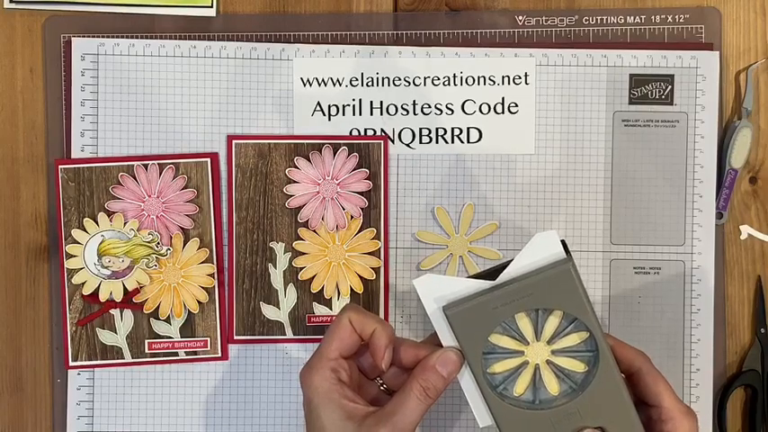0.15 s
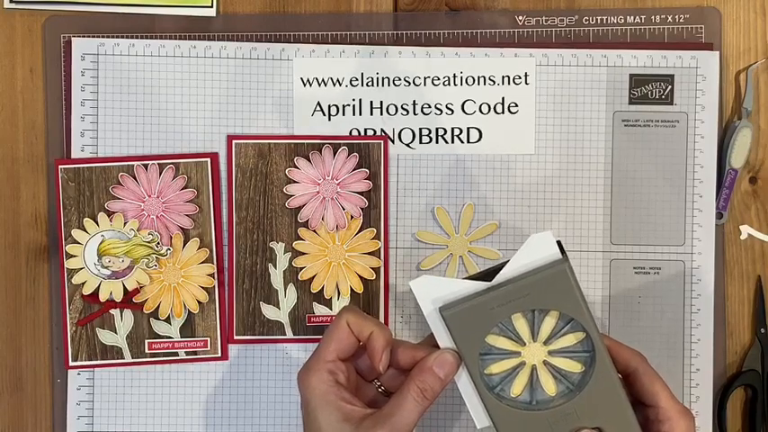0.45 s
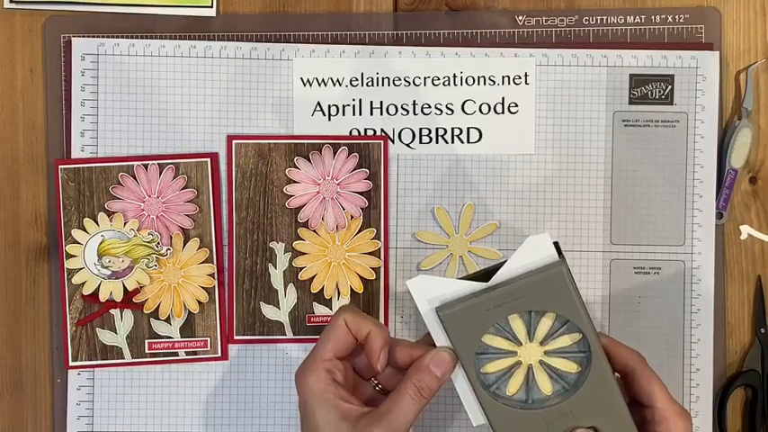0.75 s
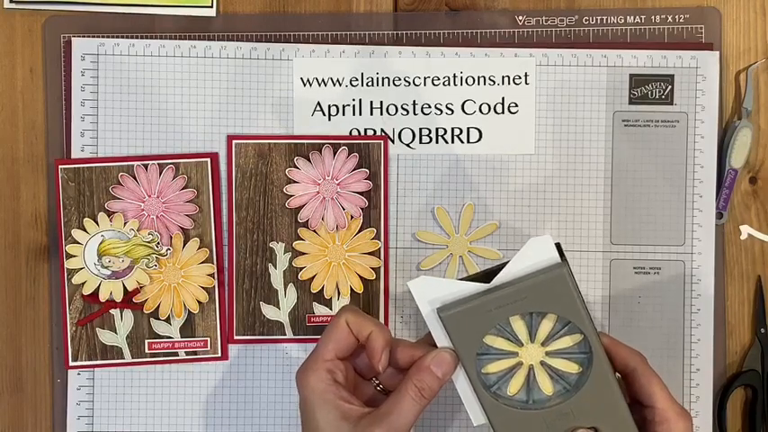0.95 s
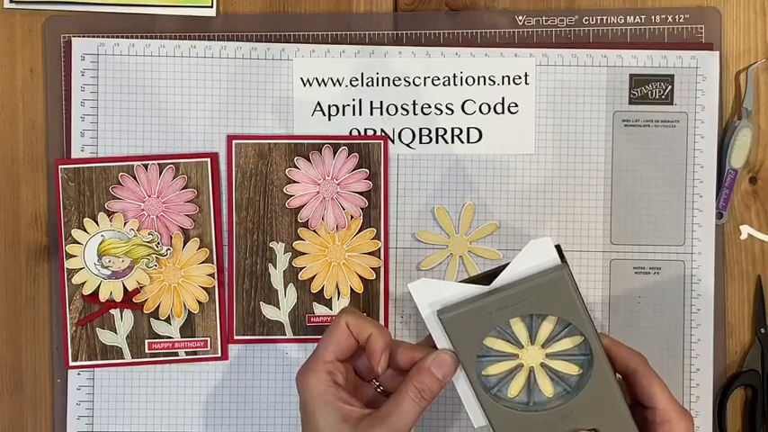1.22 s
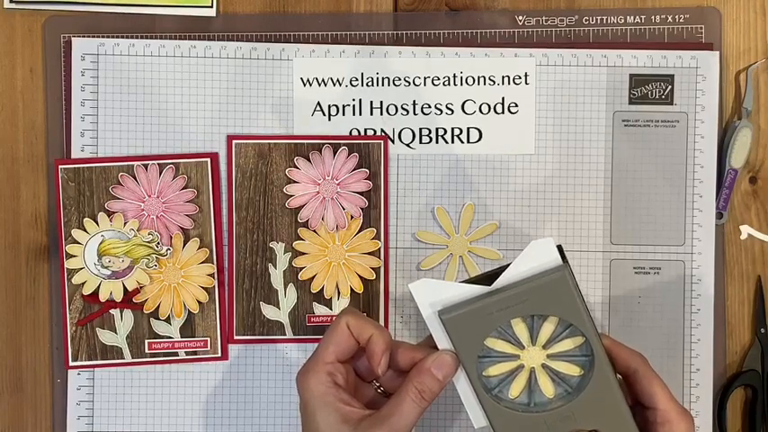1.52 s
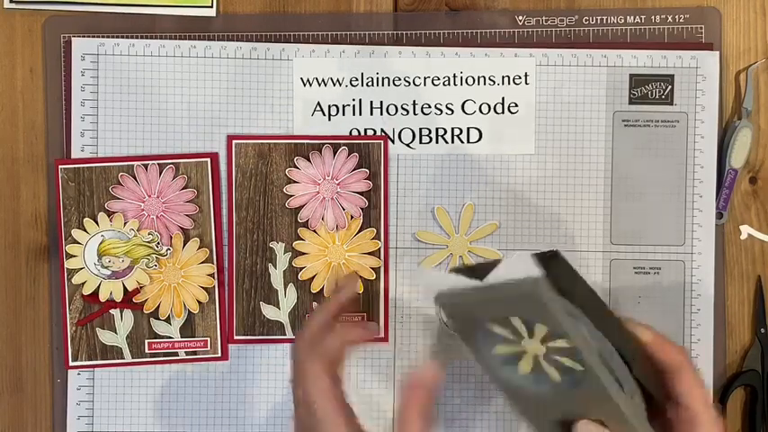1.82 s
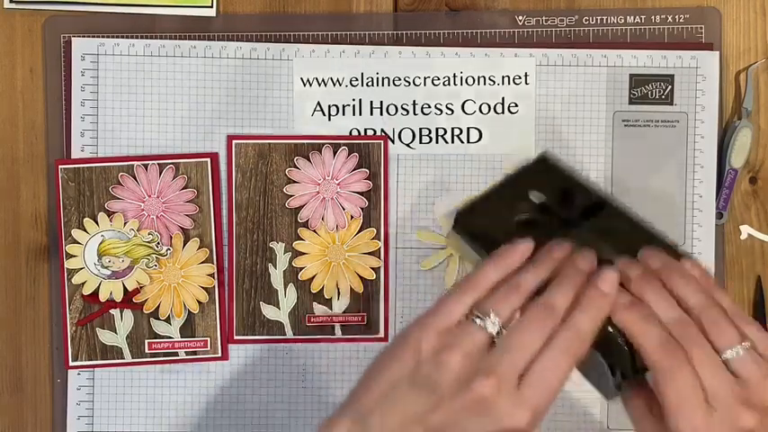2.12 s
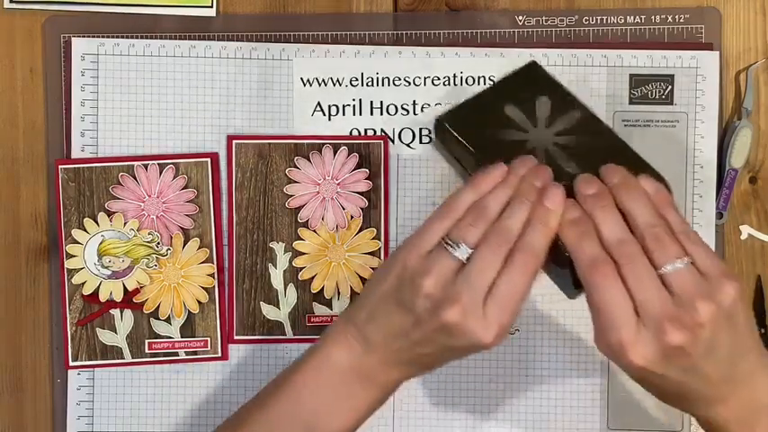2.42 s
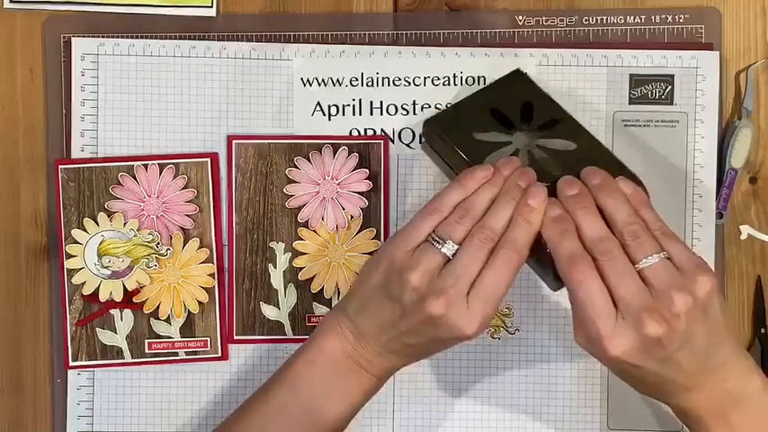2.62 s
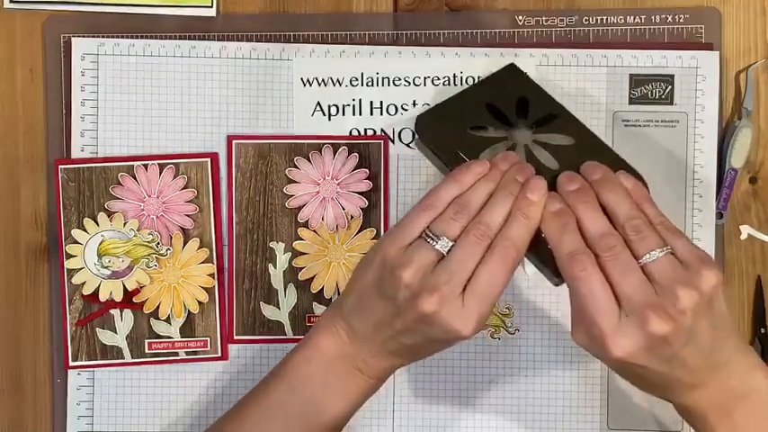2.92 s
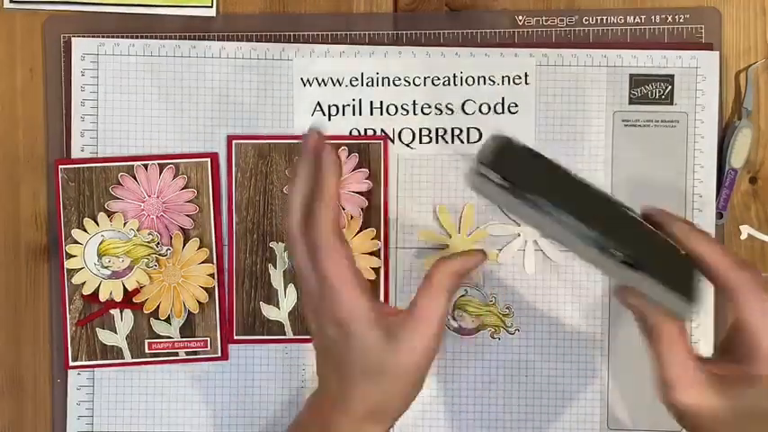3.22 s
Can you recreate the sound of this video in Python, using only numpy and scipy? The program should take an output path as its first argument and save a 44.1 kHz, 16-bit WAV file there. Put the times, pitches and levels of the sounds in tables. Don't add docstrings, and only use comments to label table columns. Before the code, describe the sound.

Paper punch squeezed on card: small sharp cracks, then one hard metallic snap in a quiet room.

```python
import sys
import numpy as np
from scipy import signal
from scipy.fft import rfft, irfft, next_fast_len
from scipy.io import wavfile
from scipy.ndimage import uniform_filter1d, map_coordinates

SR = 44100
rng = np.random.default_rng(int(sys.argv[2]) if len(sys.argv) > 2 else 0)


def to_linear_factor(level_db):
    exponent = np.asarray(level_db, float) / 20
    return 10 ** exponent


def transcribe(signal):
    frames = np.atleast_2d(signal).T
    limited = np.clip(frames, -1, 1)
    pcm = np.round(limited * 32767).astype(np.int16)
    wavfile.write(sys.argv[1], SR, pcm)


N = 147735
TIME = np.arange(N) / SR

# frequency in Hz, density in dB per Hz.
AIR_COLOUR = [(16, -54), (30, -16.5), (55, -6.5), (88, -1), (156, -7), (383, -10), (652, -14),
              (1500, -21.5), (1950, -52), (3300, -120)]
# frequency in Hz, density in dB per Hz.
HISS_COLOUR = [(880, -31), (1500, -2), (2050, -3), (4080, -5.5), (4630, -7), (6520, -5), (9370, -6),
               (12500, -7.5), (15600, -7)]
# centre in Hz, width in Hz, level in dB.
WHINE_MODES = [(6400, 900, -17), (7950, 210, 0)]
# time in ms, level in dB, width in ms.
FLICKER_BURSTS = [(.9, 0, 1.6), (14.9, -0.5, .9), (19, 0.5, 1.1), (22.5, -0.5, 1.3), (28, -6, 3)]
# centre in Hz, width in Hz, level in dB.
FLICKER_MODES = [(6450, 1100, 1), (7950, 1000, -1), (12000, 2400, 0), (14300, 1200, -3)]
# peak in seconds, level in dB.
CHIRP_EVENTS = [
    (0.0528, -62),
    (0.444, -60.5),
    (1.0999, -65),
    (2.151, -59),
]
# centre in Hz, width in Hz, level in dB.
PING_MODES = [(3910, 220, 0)]

# peak in seconds, then card crack, lever ring, hollow knock and fizz in dB.
TICK_EVENTS = [
    (1.794, -64, -65, -72, -66),
    (1.809, -65.5, -69, -70, -76),
    (1.83, -71, -81, -71, -82),
    (1.887, -65.5, -85, -73, -70),
    (2.126, -68.5, -68, -72, -80),
    (2.233, -80, -66.5, -77.5, -88),
    (2.255, -82.5, -64, -78, -88),
    (2.783, -53.5, -61.5, -59, -66),
    (3.341, -68, -76, -72.5, -81.5),
    (3.3493, -65.5, -69, -72, -71),
]
# peak in seconds, then card crack, lever ring, hollow knock and fizz in dB.
SLIP_EVENTS = [(2.271, -61, -62, -71, -71), (2.2762, -45, -36, -43.5, -56),
               (2.28, -41.5, -35.5, -65, -52.5), (2.299, -53.5, -52.5, -61, -50),
               (2.303, -44, -45, -53, -56.5), (2.351, -57.5, -46, -58.5, -52),
               (2.358, -35.5, -33.5, -47, -35), (2.361, -25.5, -19, -29.5, -25),
               (2.3632, -28, -28.5, -46, -38.5), (2.3688, -42, -26.5, -46.5, -43.5),
               (2.396, -48.5, -38, -55, -52.5), (2.434, -51.5, -42.5, -57, -56),
               (2.422, -48, -46, -49, -49), (2.456, -48, -43, -63.5, -54), (2.4607, -38.5, -37.5, -54, -41),
               (2.4653, -43, -45, -57.5, -46.5), (2.48, -52, -45.5, -60, -58.5),
               (2.473, -42.5, -48.5, -51.5, -54), (2.508, -52, -61, -77, -51.5),
               (2.556, -53, -58.5, -65, -55.5), (2.5648, -38.5, -39, -49, -44),
               (2.569, -38.5, -45.5, -52, -47.5), (2.574, -42.5, -50, -52.5, -55),
               (2.586, -46, -52.5, -61, -55), (2.591, -41.5, -45, -50.5, -49.5),
               (2.5957, -46.5, -45, -52.5, -54), (2.6012, -37.5, -43.5, -44, -45),
               (2.608, -46.5, -48, -55, -57.5), (2.625, -47.5, -62, -62, -62), (2.6392, -47, -52, -52, -53),
               (2.674, -43, -55.5, -54.5, -45.5), (2.68, -37, -49, -58.5, -46),
               (2.6854, -37, -41, -48, -43.5), (2.693, -45, -46.5, -54.5, -54.5),
               (2.705, -48, -56, -62, -58)]
# time in seconds, share of the upper lever modes, share of the upper die modes.
BITE_SHARES = [(2.26, .85, .3), (2.32, .6, 0.17), (2.36, .55, 0.53), (2.44, .5, .4), (2.5, .4, 0.27),
               (2.57, .25, .4), (2.62, .2, .3), (2.66, .3, 0.45), (2.7, .35, 0.8)]
# frequency in Hz, density in dB per Hz.
CRACK_COLOUR = [(940, -31), (1600, -2), (3570, -10), (4140, -6.5), (6420, -11.5), (6900, -16),
                (7500, -13.5), (9750, -40.5), (16500, -120)]
# frequency in Hz, density in dB per Hz.
FIZZ_COLOUR = [(5500, -28.5), (7500, -4), (8500, -1), (10000, -1), (13000, -2), (16500, -4)]
# centre in Hz, width in Hz, level in dB.
DIE_LOWER = [(1810, 230, -7.5), (2520, 220, -6.5), (3320, 260, 0), (3850, 430, -4.5)]
# centre in Hz, width in Hz, level in dB.
DIE_UPPER_MODES = [(4400, 320, -7), (5200, 300, -8.5), (6170, 430, 1.5), (8500, 430, -6.5)]
# centre in Hz, width in Hz, level in dB.
LEVER_MODES = [(1050, 55, -10), (1155, 100, -1), (1320, 150, 0), (1465, 92, -14.5)]
# centre in Hz, width in Hz, level in dB.
HOLLOW_MODES = [(184, 100, -7), (324, 190, 0), (513, 80, -1)]

# frequency in Hz, time to fall 60 dB in seconds.
ROOM_DECAY = [(150, .22), (400, .3), (900, 0.45), (2000, 0.43), (3700, 0.48), (5500, 0.4), (14000, 0.35)]
# frequency in Hz, level in dB.
ROOM_COLOUR = [(150, -4.5), (400, -4), (850, -1), (1500, -6), (2700, 1.5), (3800, -0.5), (7500, -2),
               (15000, 1.5)]
# time in seconds, level in dB.
STRAIN_LEVELS = [
    (2.268, -62),
    (2.326, -57),
    (2.448, -49.5),
    (2.498, -51.5),
    (2.618, -46.5),
    (2.79, -63),
]

# peak in seconds, level in dB, length in ms, tilt in dB per octave.
SNAP_PUFFS = [
    (2.7886, -25.5, 2.33, 4),
    (2.79, -19.5, 2.2, 6.5),
    (2.7929, -17, 2.8, 6),
    (2.7947, -18.5, 2.2, -3),
    (2.7969, -21, 1.8, -6),
]
# frequency in Hz, density in dB per Hz.
BREAK_COLOUR = [(88, -48), (150, -19.5), (725, -12.5), (1050, -10), (1780, -8.5), (2420, -5), (4350, -7.5),
                (6050, -12.5), (15700, -21.5)]
# centre in Hz, width in Hz, level in dB.
FRAME_MODES = [(810, 300, -2), (1802, 290, -1), (2580, 340, -4), (3320, 290, -1.5), (4100, 340, -0.5),
               (5060, 450, -2), (7200, 760, -13.5)]
# time in seconds, level in dB.
CLANG_EVENTS = [
    (2.7881, -32),
    (2.7915, -23),
    (2.7924, -19),
    (2.7938, -22),
]
# centre in Hz, width in Hz, level in dB.
CLANG_MODES = [(1790, 180, -4), (2320, 250, -10), (3280, 290, -3), (4250, 300, 0.5), (5020, 220, -5),
               (6700, 300, -10), (9050, 350, -11)]
# frequency in Hz, level in dB.
THUD_COLOUR = [(60, -32.5), (130, -12.5), (370, -0.5), (580, -7), (780, 2.5), (1000, -4.5), (1400, -3.5),
               (2500, -30.5)]
# frequency in Hz, level in dB.
SIDE_SLOPE = [(100, -19), (300, -2.5), (1200, -8.5), (4500, -10), (9000, -12), (16000, -21.5)]
# centre in Hz, width in Hz, level in dB.
SIDE_MODES = [(873, 240, -0.5), (1890, 500, -3.5), (2670, 300, -3), (3800, 360, 0), (5770, 800, -7.5),
              (7400, 600, -5.5)]
# centre in Hz, width in Hz, level in dB.
STEEL_MODES = [(840, 40, -4.5), (1520, 40, -7.5), (2020, 50, -9), (2690, 45, -1), (3530, 40, 1),
               (3870, 87, -0.5), (4230, 47, 1), (5040, 50, -7.5), (5500, 60, -9.5), (5900, 60, -8),
               (7170, 40, -4.5), (7560, 50, -6)]


def along(points, hz):
    f, value = np.transpose(points)
    return np.interp(np.log(hz + 1), np.log(f + 1), value)


def wobble(rate):
    knots = rng.standard_normal(int(N * rate / SR) + 4)
    return map_coordinates(knots, [np.arange(N) * rate / SR])


def swell(peak_s, width_s):
    return np.exp(-((TIME - peak_s) / width_s) ** 2)


def filtered(x, response):
    m = next_fast_len(N + 8192)
    h = response(np.fft.rfftfreq(m, 1 / SR))
    h = h / np.sqrt(np.mean(abs(h) ** 2))
    return irfft(rfft(x, m) * h, m)[..., :N]


def noise(response):
    return filtered(rng.standard_normal(N), response)


def causal(gain):
    cepstrum = irfft(np.log(gain + 1e-6))
    half = len(cepstrum) // 2
    cepstrum[1:half] *= 2
    cepstrum[half + 1:] = 0
    return np.exp(rfft(cepstrum))


def resonances(table):
    def response(f):
        total = 0
        for k, (centre, width, db) in enumerate(table):
            damping = 1j * f * width
            total = total + (-1) ** k * to_linear_factor(db) * damping / (centre * centre - f * f + damping)
        return total
    return response


def burst(s, db, ms):
    debris_db, debris_length = -12.5, 7
    k = round(ms * SR / 4000)
    u = np.arange(1, 26 * k) / k
    shape = to_linear_factor(db) * (u / 2) ** 2 * np.exp(2 - u)
    shape = shape + to_linear_factor(db + debris_db) * (u > 2) * np.exp((2 - u) / debris_length)
    spikes = to_linear_factor(2.8 * rng.standard_normal(len(u)))
    puff = shape * rng.standard_normal(len(u)) * spikes
    energy = np.linalg.norm(shape)
    out, at = np.zeros((2, N + SR // 5)), round(s * SR)
    out[0, at - 2 * k:][:len(u)] = puff * energy / np.linalg.norm(puff)
    out[1, at] = energy
    return out[:, :N]


def room_rumble():
    level_db = -69.5 + 0.88 * wobble(4) + 1.2 * wobble(15)
    return to_linear_factor(level_db) * noise(lambda f: to_linear_factor(along(AIR_COLOUR, f)))


def camera_hiss():
    hiss = to_linear_factor(-73 + 0.4 * wobble(5.5)) * noise(lambda f: to_linear_factor(along(HISS_COLOUR, f)))
    whine = to_linear_factor(-82.5 + 2.5 * wobble(17)) * noise(resonances(WHINE_MODES))
    return hiss + whine


def picture_flicker():
    picture_hz, gate = 29.97, 0
    for ms, db, width_ms in FLICKER_BURSTS:
        phase = ((TIME - ms / 1000) * picture_hz + 0.5) % 1 - 0.5
        away_ms = phase / picture_hz * 1000
        gate = gate + to_linear_factor(db + 3.5 * wobble(26)) * np.exp(-(away_ms / width_ms) ** 2 / 2)
    return to_linear_factor(-73.5) * gate * noise(lambda f: abs(resonances(FLICKER_MODES)(f)) ** 2)


def chirps():
    puffs = sum(burst(s, db - 8, 7.1)[0] for s, db in CHIRP_EVENTS)
    return filtered(puffs, lambda f: resonances([(13200, 700, 0)])(f) ** 2)


def fading_rustle():
    level = to_linear_factor(-75.5 + 1.0 * wobble(3.8)) * swell(0.18, 0.24)
    return level * noise(resonances([(500, 620, 1.5), (1900, 2200, -2.0)]))


def low_swell():
    return to_linear_factor(-68) * swell(0.2, 0.034) * noise(resonances([(410, 110, 0)]))


def ring_ping():
    return filtered(burst(1.7908, -52.5, 3.1) * [[1], [0.4]], resonances(PING_MODES))


def bite():
    s, *columns = np.transpose(BITE_SHARES)
    return [np.clip(np.interp(TIME, s, share), 0, 1) for share in columns]


def shared(force, share, lower, upper):
    return filtered(force * np.sqrt(1 - share), lower) + filtered(force * np.sqrt(share), upper)


def jolt(force):
    return force[1] + 0.49 * force


def card_through_die(modes):
    colour = [(300, -42), (650, -10)] + CRACK_COLOUR[1:-2] + [(11000, -47)]
    return lambda f: causal(to_linear_factor(along(colour, f)) * (0.39 + abs(resonances(modes)(f))))


def fizz_through_die(f):
    return causal(to_linear_factor(along(FIZZ_COLOUR, f)) * (0.78 + abs(resonances(DIE_UPPER_MODES)(f))))


def ticks_and_slips():
    slip_ms, tick_ms, knock_lag_s = 4.58, 12, 0.001
    rows = [(e, tick_ms) for e in TICK_EVENTS] + [(e, slip_ms) for e in SLIP_EVENTS]
    crack, ring, knock, fizz = (sum(burst(e[0], e[k], ms) for e, ms in rows) for k in (1, 2, 3, 4))
    lever_share, die_share = bite()
    cracking = shared(crack, die_share, card_through_die(DIE_LOWER), card_through_die(DIE_UPPER_MODES))
    ringing = shared(jolt(ring), lever_share, resonances(LEVER_MODES[:2]), resonances(LEVER_MODES[2:]))
    late_knock = np.roll(jolt(knock), round(knock_lag_s * SR), axis=1)
    knocking = filtered(late_knock, resonances(HOLLOW_MODES))
    fizzing = filtered(fizz, fizz_through_die)
    ring_gain = to_linear_factor([[-1.5], [-4.5]])
    return to_linear_factor(-1.8) * cracking + ring_gain * ringing + to_linear_factor(-1.7) * knocking + to_linear_factor(-0.56) * fizzing


def room(x):
    delay_s = 0.0025
    out, step = np.zeros(N + SR), SR // 10
    for i in range(int(1.7 * SR), N, step):
        hz, t, z = signal.stft(rng.standard_normal(SR * 6 // 10), SR, nperseg=256)
        decay = to_linear_factor(-60 * t / along(ROOM_DECAY, hz)[:, None])
        tail = signal.istft(z * decay, SR, nperseg=256)[1]
        build_up = np.clip(np.arange(len(tail)) / SR / delay_s, 0, 1) ** 2
        tail = tail / np.linalg.norm(tail) * build_up
        wet = signal.fftconvolve(x[i:i + step], tail)
        out[i:i + len(wet)] += wet
    return to_linear_factor(-6.5) * filtered(out[:N], lambda f: to_linear_factor(along(ROOM_COLOUR, f)))


def hand_shuffle():
    level = to_linear_factor(-74 + 3.2 * wobble(20)) * swell(2.02, 0.19)
    return level * noise(resonances([(450, 350, 3.5), (1300, 900, -5)]))


def strain():
    grains_per_s, grain_db, spread_db, grain_decay_s = 160, 8.5, 6, 0.0008
    s, db = np.transpose(STRAIN_LEVELS)
    db = np.interp(TIME, s, db, -120, -120)
    grains = (rng.random(N) < grains_per_s / SR) * to_linear_factor(grain_db + spread_db * rng.standard_normal(N))
    grains = signal.fftconvolve(grains, np.exp(-np.arange(200) / SR / grain_decay_s))[:N]
    force = rng.standard_normal(N) * to_linear_factor(db - 16.5) * (to_linear_factor(3.5 * wobble(49)) + grains)
    squeezing = uniform_filter1d(1. * (db > -100), size=4000)
    grip = rng.standard_normal(N) * to_linear_factor(-72 + 3 * wobble(20)) * squeezing

    def die_and_lever(f):
        die = to_linear_factor(along(CRACK_COLOUR, f)) * abs(resonances(DIE_LOWER + DIE_UPPER_MODES)(f))
        return 0.42 * die + 0.1 * resonances(LEVER_MODES)(f)
    return filtered(force, die_and_lever) + filtered(grip, lambda f: resonances([(110, 130, 0)])(f) ** 2)


def breaking(tilt_db):
    def response(f):
        colour = to_linear_factor(along(BREAK_COLOUR, f) + tilt_db * np.log2(1 + f / 1000))
        return causal(colour * (0.55 + abs(resonances(FRAME_MODES)(f))))
    return response


def sideways(f):
    modes = 0.6 * abs(resonances(SIDE_MODES)(f)) + 0.6 * abs(resonances(STEEL_MODES)(f))
    return causal(to_linear_factor(along(SIDE_SLOPE, f)) + modes)


def snap():
    thud_s = 2.7958
    tearing = sum(filtered(burst(s, db, ms)[0], breaking(tilt_db)) for s, db, ms, tilt_db in SNAP_PUFFS)
    clang = filtered(sum(burst(s, db, 4.4)[1] for s, db in CLANG_EVENTS), resonances(CLANG_MODES))
    thud = filtered(burst(thud_s, -20, 2.6)[1], lambda f: causal(to_linear_factor(along(THUD_COLOUR, f))))
    side = filtered(burst(thud_s, -10, 2.3)[1], sideways)
    return np.array([tearing + clang + thud, side])


def scene():
    floor = room_rumble() + camera_hiss() + picture_flicker() + chirps()
    floor = floor + fading_rustle() + low_swell() + hand_shuffle()
    near, even = ring_ping() + ticks_and_slips() + snap()
    creak = strain()
    return (near + creak + room(even + creak) + floor)[None]


def camera_band(f):
    low_hz, top_hz, edge_hz, above_top_db = 38, 15720, 60, -40
    step_down = (1 + np.tanh((f - top_hz - edge_hz) / edge_hz)) / 2
    return to_linear_factor(above_top_db * step_down) / (1 + (low_hz / (f + 1)) ** 8)


def low_pass(x):
    return signal.sosfilt(signal.butter(12, 16980, fs=SR, output="sos"), x)


def record(dry):
    mix = to_linear_factor(-0.7) * filtered(dry, camera_band)
    return low_pass(mix)


dry = scene()
out = record(dry)
transcribe(out)
```